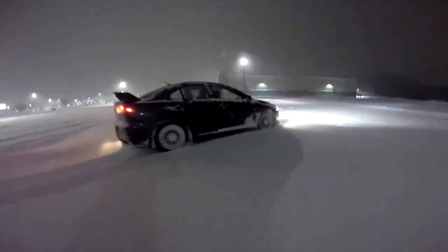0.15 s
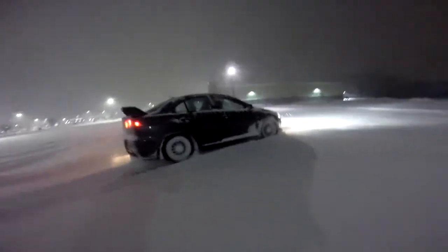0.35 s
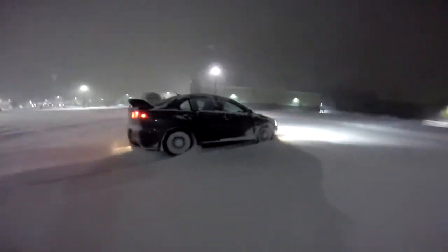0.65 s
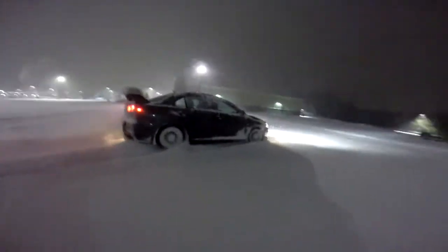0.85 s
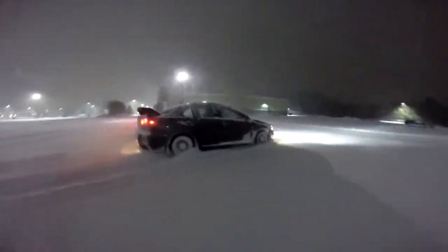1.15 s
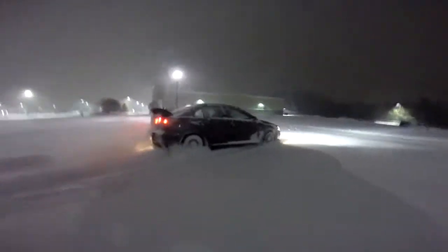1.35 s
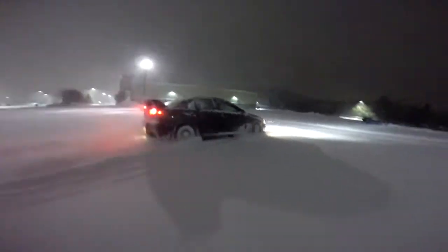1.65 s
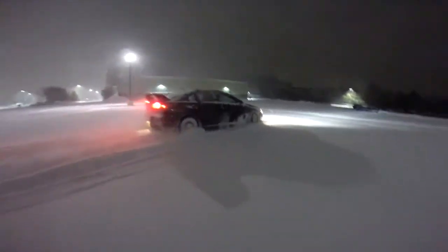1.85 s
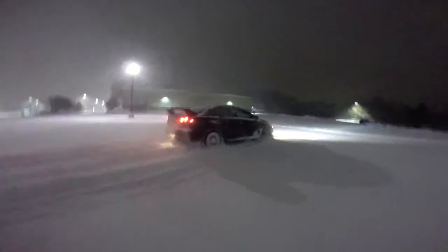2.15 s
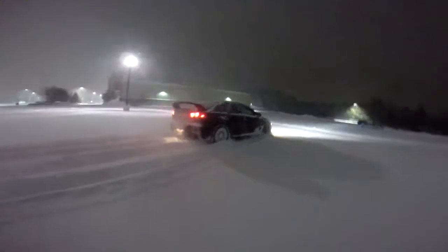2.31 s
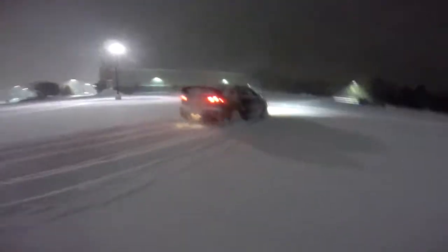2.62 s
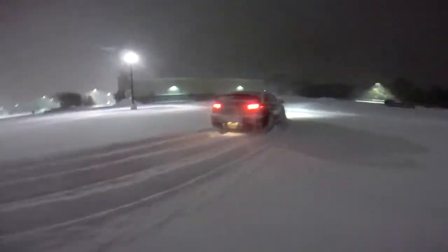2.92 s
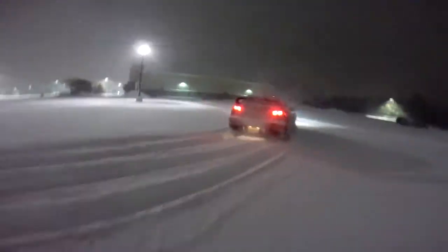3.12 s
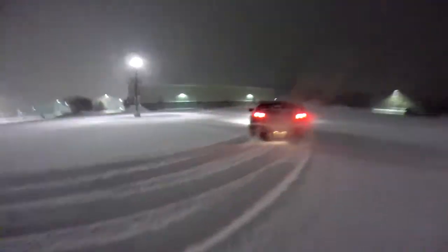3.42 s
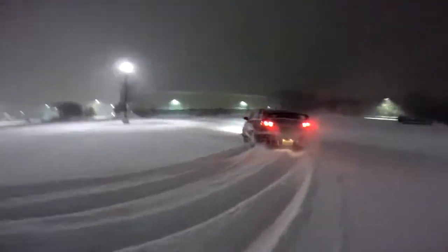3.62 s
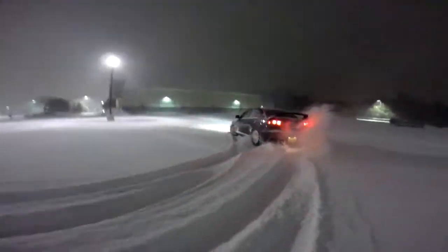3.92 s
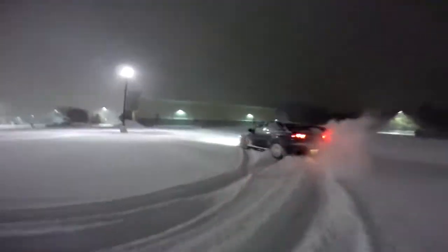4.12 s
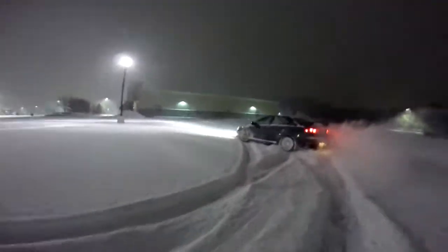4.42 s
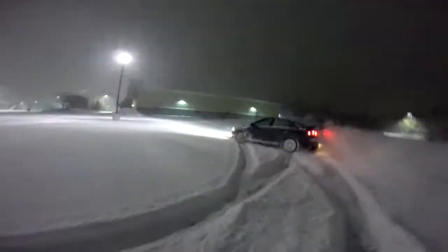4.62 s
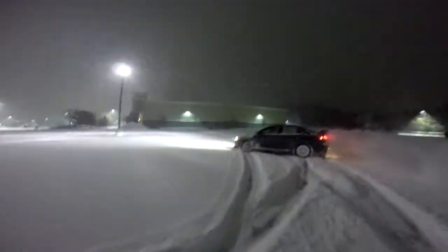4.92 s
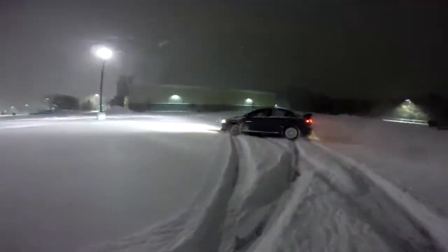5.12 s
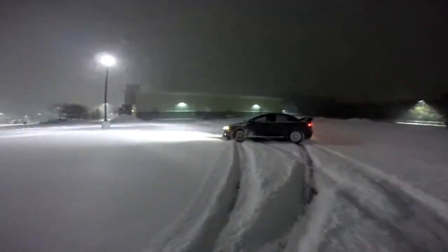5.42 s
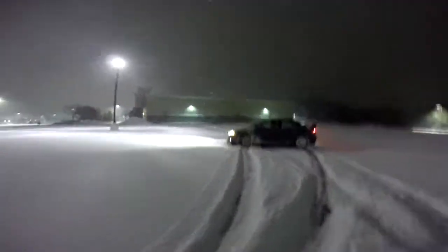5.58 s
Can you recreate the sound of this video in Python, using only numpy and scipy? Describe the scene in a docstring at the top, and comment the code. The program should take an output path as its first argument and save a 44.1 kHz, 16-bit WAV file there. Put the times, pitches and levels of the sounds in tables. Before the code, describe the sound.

Brittle, dry clicks and crumbling grains strike a plastic housing right at the microphone, busiest early on. Behind them a car drifts through deep snow: a soft low engine drone that sags, rises and drops again, with grainy tyre churn, spray swishes and brief scrunches. Low wind gusts buffet the microphone. Finally the engine slows and pressurised air escapes in a breathy hiss. Open air, no echo.

```python
"""Crumbs of icy snow tick and crumble on a plastic housing by the microphone: each is a burst of crushing noise
that rings the housing. A snowy car park at night, a turbocharged four-cylinder car sliding round close by in light wind.
Tyres churn, spray and scrunch the snow (shaped noise and grains); the muffled exhaust hums low (sines at the firing
orders, with chuffs of noise). Wind rumbles on the microphone (low noise). At the end the revs fall and the turbo
vents its boost in a hiss (noise through resonances)."""
import sys
import numpy as np
from scipy import signal
from scipy.fft import rfft, irfft
from scipy.io import wavfile
from scipy.ndimage import uniform_filter1d

SR = 44100
rng = np.random.default_rng(int(sys.argv[2]) if len(sys.argv) > 2 else 0)


def generate_wav(sig):
    """Save sig (samples, or channels by samples) to the path in sys.argv[1] as 16-bit PCM at SR."""
    pcm = np.round(np.clip(np.atleast_2d(sig).T, -1, 1) * 32767).astype(np.int16)
    wavfile.write(sys.argv[1], SR, pcm)


N = 253575
TIME = np.arange(N) / SR   # seconds


def from_db(db):
    """Decibels to an amplitude factor."""
    return 10 ** (np.asarray(db) / 20)


def rms_one(x):
    """Scales a sound to rms 1."""
    return x / np.sqrt(np.mean(x ** 2) + 1e-20)


def in_time(rows):
    """Columns of a curve table, joined by straight lines, at every sample."""
    s, *columns = np.transpose(rows)
    return [np.interp(TIME, s, c) for c in columns]


def drift(rate):
    """Smooth chance with about `rate` turns a second; spread 1."""
    step = 40   # samples between the slow values
    r = np.exp(-2 * np.pi * rate * step / SR)
    settle = 2000
    noise = rng.standard_normal(N // step + settle + 2)
    slow = signal.lfilter([1], [1, -2 * r, r * r], noise)[settle:]
    return np.interp(np.arange(N) / step, np.arange(len(slow)), rms_one(slow))


def swell(s, length):
    """A rounded rise and fall that starts at s."""
    return np.sqrt(np.abs(np.sin(np.pi * np.clip((TIME - s) / length, 0, 1))))


def surges(rows, steady_db):
    """Gain of a steady flow with smooth surges (peak time, length, dB) added in power."""
    power = from_db(steady_db) ** 2
    for s, length, db in rows:
        shape = np.cos(np.pi * np.clip((TIME - s) / length, -.5, .5))
        power = power + (from_db(db) * shape) ** 2
    return np.sqrt(power)


def band(x, low_hz, high_hz, order=2):
    """Causal band-pass."""
    edges = [low_hz, min(high_hz, SR / 2 - 1)]
    return signal.sosfilt(signal.butter(order, edges, "band", fs=SR, output="sos"), x)


def coloured(x, spectrum):
    """Filters a steady sound by the spectrum's gains, falling off below its first row; rms 1."""
    hz, db = np.transpose(spectrum)
    bins = np.maximum(np.arange(N // 2 + 1) * SR / N, 1)
    gain = from_db(np.interp(np.log(bins), np.log(hz), db))
    gain = gain * np.minimum(bins / hz[0], 1) ** 2
    return rms_one(irfft(rfft(x) * gain, N))


def ring(x, hz, t60):
    """A unit click sets a sine of height 1 ringing."""
    r, w = from_db(-60 / (t60 * SR)), 2 * np.pi * hz / SR
    return signal.lfilter([0, np.sin(w)], [1, -2 * r * np.cos(w), r * r], x + 1e-18)


def resonance(x, hz, width_hz):
    """Two-pole peak with gain 1 on top."""
    r = np.exp(-np.pi * width_hz / SR)
    numerator = np.array([1, 0, -1]) * (1 - r * r) / 2
    return signal.lfilter(numerator, [1, -2 * r * np.cos(2 * np.pi * hz / SR), r * r], x)


def grains(per_s, spread_db):
    """Random clicks, many small and a few large; rms 1."""
    sizes = from_db(spread_db * np.minimum(rng.exponential(1, N), 4)) * rng.choice([-1, 1], N)
    return rms_one(sizes * (rng.random(N) < per_s / SR))


def fading(x, decay_s):
    """Each click becomes a burst that dies away exponentially."""
    return signal.lfilter([1], [1, -np.exp(-1 / (decay_s * SR))], x)


def unit(v):
    """Scales a short burst to the energy of 4 ms at rms 1."""
    return v / np.sqrt(np.sum(v ** 2) / (.004 * SR) + 1e-20)


# Large crumbs of snow striking the housing. Each row: moment of the crush in seconds, level of the ring
# in dB over 4 ms, strongest ring in Hz, second ring in Hz, crack in dB re ring, thud in dB re ring.
CRUMBS = [(0.0935, -50, 1510, 2930, -16, -8), (0.1185, -46.5, 2780, 4730, 0.5, -12),
          (0.148, -56, 3030, 5400, 2, -20), (0.2662, -45.5, 2300, 3270, -10, -7),
          (0.3137, -39.5, 2820, 4400, -12.5, -19), (0.324, -49, 3370, 5500, -3, -20),
          (0.368, -49.5, 5550, 2370, -8, -3.5), (0.4496, -44, 1900, 2670, -29, -4.5),
          (0.467, -49.5, 3230, 2140, -1, -26), (0.5088, -44.5, 2265, 3500, -19, -5.5),
          (0.5544, -46.5, 2490, 4260, -7, -2), (0.5758, -46, 1590, 2070, -31, -9),
          (0.6188, -48, 1550, 2140, -1, -23), (0.6501, -50, 2130, 2730, -4, -19),
          (0.6829, -47.5, 2310, 5660, -2, -24), (0.7016, -49, 1520, 4600, -4, -2),
          (0.7094, -42.5, 3460, 5600, 1, -26), (0.7247, -35.5, 2510, 4130, -8.5, -10),
          (0.7388, -38, 2480, 2930, -15, -9), (0.8219, -45, 1590, 1920, -6, -1),
          (0.8276, -39, 2700, 5530, -10, -26), (0.8498, -36, 1560, 2340, -28, -9),
          (0.881, -38.5, 2130, 1640, -26, -15), (0.908, -35, 2500, 4220, -16.5, -20),
          (0.9123, -47, 2775, 2398, -13, -2), (0.9454, -27.5, 2730, 3270, -20, -24),
          (1.029, -53, 1780, 4500, -3, -18), (1.0683, -42.5, 5600, 2776, -5, -24),
          (1.1406, -40, 4530, 3635, -7, -16), (1.1568, -41, 2380, 1590, -22, -15),
          (1.1643, -51, 5860, 4690, -3, -23), (1.181, -51.0, 2698, 6120, 4, -16),
          (1.192, -48.5, 2650, 2110, -2, -22), (1.1982, -30.5, 4320, 2310, -9.5, -19),
          (1.2699, -50, 5470, 2690, -3, -16), (1.2837, -39.5, 2460, 1720, -11, -20),
          (1.3004, -36.5, 2720, 2100, -9, -24), (1.306, -33.5, 2260, 1600, -17, -6),
          (1.3083, -31.5, 2120, 1810, -12, -22), (1.314, -42, 1890, 5990, -6, -11),
          (1.3382, -47.5, 1680, 3400, -1, -2), (1.3607, -34, 2350, 3525, -16, -22),
          (1.3865, -38, 1590, 2350, 1, -17), (1.3925, -30, 3500, 4440, -20, -28),
          (1.4012, -40, 5400, 3500, -7, -19), (1.424, -36, 2781, 4600, -6.5, -27),
          (1.4799, -41, 2250, 4630, -3.5, -6), (1.4986, -31.5, 2390, 1740, -8.5, -8.5),
          (1.507, -33, 2254, 2840, -10, -30), (1.5476, -48, 2710, 3450, -6, -14),
          (1.5691, -47.0, 2340, 3470, -12, -16), (1.5978, -43.5, 2650, 1570, -11, -7),
          (1.6459, -47.5, 2668, 1560, -19, -27), (1.6574, -40.5, 4660, 5810, -16, -22),
          (1.7011, -35.5, 2510, 5200, -8, -28), (1.7047, -45, 2540, 4030, -9, -13),
          (1.7315, -51, 2384, 1720, -7, -21), (1.758, -43, 5700, 1620, -5, -28),
          (1.808, -29.5, 2390, 4700, -6, -32), (1.825, -37, 4600, 2280, -11, -21),
          (1.8344, -42.5, 2670, 4290, -7, -29), (1.8561, -40.5, 4700, 3380, -6, -24),
          (1.8652, -40.5, 3540, 5710, -9, -23), (1.8854, -49, 2400, 1680, -1, -25),
          (1.928, -52.5, 2760, 3380, 0, -22), (2.123, -37, 1540, 3200, 0, -16),
          (2.1434, -34.5, 4670, 3470, -3, -27), (2.1554, -29, 2620, 1560, -8, -18),
          (2.1839, -35.5, 1609, 2176, -18, -24), (2.2235, -33, 3360, 4480, -6, -26),
          (2.229, -41.5, 2700, 5790, 2, -12), (2.2484, -46, 2240, 1510, -33, -26),
          (2.2563, -34.5, 5250, 4460, -9, -13), (2.2665, -31.5, 2250, 1700, -8, -29),
          (2.2702, -33.5, 2450, 4260, -14, -33), (2.414, -50.5, 3450, 4720, -11, -25),
          (2.4212, -43.5, 3330, 2670, -14, -13), (2.5666, -48.0, 2750, 1560, -11, -26),
          (2.6095, -43.5, 2640, 1610, -14, -26), (2.8492, -51, 4770, 3420, 0.5, -6),
          (2.881, -49, 3530, 5370, -10, -25), (2.8902, -49.0, 2453, 1790, -26, -24),
          (3.1088, -50, 2790, 2300, -4, -25), (3.1448, -53, 6180, 4330, 2, -11),
          (3.1729, -40, 2600, 3400, -17, -27), (3.244, -46.0, 3550, 5770, 0, -23),
          (3.2641, -46.5, 2730, 5300, -15, -22), (3.4727, -44.5, 1672, 2160, -12, -9),
          (3.848, -48.0, 2450, 1810, -33, -21), (3.9936, -38, 3560, 4330, -12, -29),
          (4.1823, -47.5, 1460, 3530, -33, -24), (4.3324, -39.0, 3600, 4300, -8.5, -23),
          (4.4424, -47.5, 2800, 2090, -22, -20), (4.6699, -38.5, 1540, 2230, -17, -3.5),
          (4.7443, -46.5, 4700, 3480, -7, -18), (5.2145, -46, 4600, 2260, -6.5, -22),
          (5.2794, -39.5, 5600, 2830, -13, -27), (5.3433, -40, 2670, 2000, -14, -12),
          (5.5408, -37, 2420, 3530, -13.5, -9)]
# Modes of the plastic housing. Each row: pitch in Hz, relative level in dB, t60 in seconds.
HOUSING = [(1590, 2, 0.012), (1842, 8.5, 0.0038), (2395, 7, 0.0084), (2730, 2, 0.016), (3433, 5, 0.0056),
           (4150, 0, 0.0084), (4670, 6, 0.0051), (5440, 2, 0.0099), (7270, -4.5, 0.016)]


def crumbs(second_db=-7.5, housing_db=-2.0, dry_db=-10.5, width_share=0.066,
           crush_s=0.00035, debris_db=-11.5, debris_s=0.0032, focus_db=13.0, low_edge_share=0.66):
    """Each crumb is crushed in about a millisecond: a crack, two rings set by where it lands, other modes, a thud."""
    out = np.zeros(N + SR)
    t = np.arange(SR // 30) / SR
    lead_s = .002   # loose flakes touch down just ahead of the crumb and just after it
    since = np.maximum(t - lead_s + crush_s, 0) / crush_s
    flakes = np.exp(-np.abs(t - lead_s) / debris_s) * np.minimum(t / lead_s, 1)
    pressure = since * np.exp(1 - since) + from_db(debris_db) * flakes
    for s, db, hz, second_hz, crack_db, thud_db in CRUMBS:
        jerks = rng.standard_normal(len(t))
        force = jerks * np.abs(jerks) * pressure   # ice gives way in jerks
        low_edge_hz = low_edge_share * min(hz, second_hz)
        drive = band(force, max(low_edge_hz, 1300), 7200, order=4)
        others = np.zeros(len(t))
        for mode_hz, mode_db, t60 in HOUSING:
            if mode_hz > low_edge_hz:
                # modes far from the strongest ring are driven less, by focus_db an octave
                driven_db = mode_db - focus_db * abs(np.log2(mode_hz / hz))
                others += rng.choice([-1, 1]) * from_db(driven_db) * unit(ring(drive, mode_hz, t60))
        first = unit(resonance(drive, hz, width_share * hz))
        second = unit(resonance(drive, second_hz, width_share * second_hz))
        crunch = unit(band(drive, 1200, 1.9 * max(hz, second_hz)))   # the crush itself, heard directly
        body = first + from_db(second_db) * second
        body = unit(body + from_db(housing_db) * unit(others) + from_db(dry_db) * crunch)
        crack = unit(band(band(force, 5230, 14700, order=3), 3270, 7600, order=1))
        thud = unit(unit(band(force, 100, 805, order=3)) + 0.42 * unit(resonance(force, 702, 125)))
        start = int((s - lead_s) * SR)
        strike = body + from_db(crack_db) * crack + from_db(thud_db) * thud
        out[start:start + len(t)] += from_db(db) * strike
    return out[:N]


# Clumps of snow crumbling over the housing. Each row: start in seconds, length in seconds,
# level in dB before clump_db is added.
CLUMPS = [(0.105, 0.037, -50.5), (1.298, 0.033, -48), (1.348, 0.069, -45.5), (1.467, 0.049, -55),
          (1.532, 0.049, -55.5), (1.755, 0.038, -46), (1.806, 0.048, -43.5), (1.851, 0.077, -45.5),
          (1.925, 0.077, -54.5), (2.109, 0.052, -38), (2.208, 0.087, -40.5), (2.406, 0.068, -49.5),
          (2.799, 0.09, -56.5), (2.8, 0.52, -64), (3.095, 0.074, -57), (3.22, 0.051, -53.5),
          (4.448, 0.014, -45)]
# Spectrum filter of the crumbling. Each row: frequency in Hz, relative gain in dB.
CLUMP_COLOUR = [(400, -12), (750, -7), (1100, -2.5), (1550, 0), (1900, 0), (2500, 5), (3100, 1.5),
                (3500, 1), (4700, -2.5), (5100, -6), (5700, 0.5), (8000, -9), (13000, -12.5), (16000, -23)]


def clumps(clump_db=-1.5, fine_share=0.37, thump_db=-14.5, grain_s=0.00068, pitched_share=0.33):
    """Clumps thump softly and break into separate grains, dealt out among ten pitches."""
    crushes = fading(np.abs(grains(650, 3.0)) + 1e-18, grain_s)
    rasp = rms_one(crushes * rng.standard_normal(N))
    pitches = np.geomspace(1300, 9000, num=10)
    dealt = rng.integers(0, len(pitches), N)[np.arange(N) // (SR // 400)]   # a new pitch 400 times a second
    pitched = np.zeros(N)
    for k, hz in enumerate(pitches):
        pitched += resonance(rasp * (dealt == k), hz, 0.22 * hz) / np.sqrt(hz)
    rasp = rasp + pitched_share * rms_one(pitched) + fine_share * rng.standard_normal(N)
    thump = from_db(thump_db) * rms_one(band(rasp, 117, 440))
    level = sum(from_db(db) * swell(s, length) for s, length, db in CLUMPS)
    return from_db(clump_db) * level * (coloured(rasp, CLUMP_COLOUR) + thump)


# Snow dust drifting on to the housing. Each row: time in seconds, level in dB before dust_db is added.
DUST = [(0, -68.5), (.6, -56.5), (1.2, -59), (1.9, -54.5), (2.65, -65), (3.1, -64), (3.5, -65.5),
        (4.2, -64.5), (5.0, -61), (5.75, -60.5)]


def dust(dust_db=0.5, click_share=0.32):
    """Flurries of specks, each a crush of a fraction of a millisecond, tick on the housing and ring its modes."""
    level_db, = in_time(DUST)
    flurries = grains(140, 3.3) * from_db(3 * drift(15))
    specks = fading(flurries, .0003) * rng.standard_normal(N)
    rings = sum(from_db(db) * ring(specks, hz, t60) for hz, db, t60 in HOUSING)
    clicks = rms_one(band(specks, 3840, 10500))
    patter = rms_one(band(rings, 1100, 7600)) + click_share * clicks
    return from_db(level_db + dust_db) * patter


# How hard the wheels churn the snow. Each row: time in seconds, level in dB before churn_db is added.
CHURN = [(0.0, -60.5), (0.62, -60), (1.17, -59), (1.39, -54), (1.81, -60.5), (2.07, -55.5), (2.5, -60.5),
         (2.85, -60.5), (3.39, -58), (4.0, -57), (4.39, -59), (4.87, -59), (5.49, -60.5), (5.75, -59.5)]
# The wheels bite and throw a fan of snow. Each row: peak in seconds, length in seconds, level in dB.
SPRAYS = [(.29, 0.22, -59), (1.0, 0.099, -60.5), (1.43, 0.38, -54.5), (2.09, 0.7, -58.5),
          (3.38, 0.056, -55.5), (3.72, 0.11, -57.5), (3.86, 0.39, -61.5), (3.99, 0.3, -60.5),
          (4.16, 0.28, -59), (4.81, 0.061, -54), (4.91, 0.26, -56)]
# Spectrum filters of the churning, the spray and the hiss. Each row: frequency in Hz, relative gain in dB.
CHURN_COLOUR = [(50, 17.5), (110, 10.5), (180, 1), (300, 2.5), (500, 0), (780, -2.5), (1100, -6),
                (1350, -6), (1560, -2), (1850, -6.5), (3000, -18.5), (6000, -59)]
SWISH_COLOUR = [(900, -25), (1550, 12), (1900, 0), (2300, 11), (2850, 12), (3300, 1), (4300, -8),
                (5000, -19), (5600, -2), (6500, -30), (10000, -36), (15000, -70)]
HISS_COLOUR = [(2000, 3), (4000, 3.5), (5600, -0.5), (7500, -5), (9000, -8.5), (10400, -8), (12000, -12.5),
               (15000, -21), (17000, -54)]
SPRAY_DB = -69   # swish of the snow that the wheels throw all the time


def wheels(churn_db=5.0, hiss_db=-66.5):
    """Tyres churn the snow and throw a spray that swishes in quick swells, over a faint steady hiss."""
    level_db, = in_time(CHURN)
    churn = coloured(rng.standard_normal(N) + .5 * grains(900, 4.2), CHURN_COLOUR)
    churn = from_db(level_db + churn_db + 2.0 * drift(35.5)) * churn
    spray = coloured(rng.standard_normal(N) + 0.6 * grains(2800, 5.1), SWISH_COLOUR)
    spray = surges(SPRAYS, SPRAY_DB) * from_db(1.0 * drift(40)) * spray
    return churn + spray + from_db(hiss_db) * coloured(rng.standard_normal(N), HISS_COLOUR)


# Packed snow scrunching and squeaking under the tyres. Each row: start in seconds, length in seconds,
# pitch in Hz, width of the first of two resonances as a share of the pitch, level in dB.
SCRUNCHES = [(0.236, 0.069, 3580, 0.088, -57.5), (3.67, 0.058, 3550, .12, -63),
             (4.114, 0.099, 1420, 0.37, -54), (4.35, 0.045, 2560, 0.14, -58),
             (4.743, 0.29, 450, 0.16, -61.5)]


def scrunches():
    """Snow slips in many tiny jerks, ringing round one pitch."""
    slips = grains(1200, 4.6)
    out = np.zeros(N)
    for s, length, hz, width_share, db in SCRUNCHES:
        width_hz = width_share * hz
        squeak = rms_one(resonance(resonance(slips, hz, width_hz), hz, 2 * width_hz))
        out += from_db(db) * swell(s, length) * squeak
    return out


# Engine speed. Each row: time in seconds, firing rate in Hz.
REVS = [(0, 84), (.75, 90.6), (1.45, 89), (1.7, 85), (2.0, 78.5), (2.45, 66), (2.7, 78), (2.9, 94),
        (3.2, 99), (3.45, 111), (3.7, 116.5), (4.4, 86), (4.7, 77), (5.05, 96), (5.4, 67), (5.58, 58),
        (5.75, 58)]
# The driver eases off the throttle. Each row: start in seconds, length in seconds, drop of the firing tone in dB.
LIFTS = [(1.1, 0.66, 15), (2.42, 0.12, 10), (2.76, 0.42, 5), (3.84, 0.52, 16), (4.361, 1, 8)]
TONE_DB, OCTAVE_DB = -55.5, -69.5   # firing tone and its octave under throttle, at cruising revs
CRUISE_HZ, BOOM_HZ, BOOM_DB = 93.3, 58, 16   # the exhaust booms as the revs sink from cruising to this rate
OCTAVE_DB_PER_OCTAVE = 13   # the note hardens as the revs climb above cruising
TAIL_ON_S, TAIL_ON_LENGTH_S, TAIL_ON_DB = 1.75, 2.75, 4   # tailpipe swings to the microphone: overtones gain


def engine(upper_db=-11.0, half_db=-14.5, octave_boom=0.32, octave_lift=0.15, chuff_db=-8.5):
    """Exhaust through a silencer: firing tone, fading overtones, half orders of uneven firing, and chuffs."""
    hz, = in_time(REVS)
    boom_db = BOOM_DB * np.clip((CRUISE_HZ - hz) / (CRUISE_HZ - BOOM_HZ), 0, 1)
    lift_db = sum(db * swell(s, length) for s, length, db in LIFTS)
    first_db = TONE_DB + boom_db - lift_db
    second_db = OCTAVE_DB + OCTAVE_DB_PER_OCTAVE * np.maximum(np.log2(hz / CRUISE_HZ), 0)
    second_db = second_db + octave_boom * boom_db - octave_lift * lift_db
    second_db = second_db + TAIL_ON_DB * swell(TAIL_ON_S, TAIL_ON_LENGTH_S)
    # bogged down in the snow, the cylinders fire less evenly
    lugging_db = np.interp(TIME, [1.8, 2.15, 2.45], [-6, 9, -7])
    orders = [(1, first_db), (2, second_db)]   # multiple of the firing rate, level in dB
    for i, k in enumerate([3, 4, 5, 6]):
        orders.append((k, second_db + upper_db - 2.0 * i))
    for i, k in enumerate([1.5, 2.5]):
        orders.append((k, first_db + half_db + lugging_db - 8.3 * i))
    phase = 2 * np.pi * np.cumsum(hz * (1 + .003 * drift(10))) / SR
    tones = np.zeros(N)
    for k, db in orders:
        unsteady = 1 + min(.2 * k, .6) * drift(16)
        wander = .14 * k * drift(12) + rng.uniform(0, 2 * np.pi)
        tones += from_db(db) * unsteady * np.sin(k * phase + wander)
    puffs = rng.standard_normal(N) * (1 + np.cos(phase)) ** 3   # one puff of noise a firing
    return tones + from_db(second_db + chuff_db) * rms_one(band(puffs, 113, 305))


# Resonances of the vent. Each row: pitch in Hz, width in Hz of each of two passes, gain in dB before the deepening.
VENT_MODES = [(1230, 490, -11), (1613, 180, 0), (2004, 170, 1.5), (2584, 490, 3), (2960, 310, 7),
              (3600, 360, 2), (4330, 840, 4.5), (4650, 510, 1.5), (5620, 420, 0.5), (6430, 1000, -9),
              (7540, 390, -11), (8900, 650, -19), (9900, 1100, -22.5), (12000, 3800, -28)]
VENT_S, VENT_RISE_S, VENT_RISE_DB = 5.069, 0.29, 18   # the valve starts to open; time and swing of its rise
VENT_DEEPEN_DB_PER_S = 23.5   # gain of a resonance an octave below 3 kHz, once fully open
VENT_HOLD_DB, VENT_PUFF_DB, VENT_PUFF_S = -48, 5.5, 0.12   # hiss before deepening; first puff, its drain time


def turbo_vent(flutter_db=1.8):
    """Boost air rushes through the valve and pipe resonances: a puff, then a hiss deepening as pressure falls."""
    since_open = TIME - VENT_S - VENT_RISE_S
    opening = np.minimum(since_open / VENT_RISE_S, 0)
    draining_s = np.maximum(since_open, 0)
    level_db = VENT_HOLD_DB + VENT_RISE_DB * opening + VENT_PUFF_DB * np.exp(-draining_s / VENT_PUFF_S)
    deep_db = VENT_DEEPEN_DB_PER_S * draining_s
    hiss, power = 0, 0
    for hz, width, db in VENT_MODES:
        mode = from_db(db) * resonance(resonance(rng.standard_normal(N), hz, width), hz, width)
        power += np.mean(mode ** 2)
        octaves_below = np.clip(np.log2(3000 / hz), 0, 2)
        hiss += mode * from_db(deep_db * octaves_below + flutter_db * drift(18))
    return from_db(level_db) * hiss / np.sqrt(power) * (TIME > VENT_S)


# Sharp buffets of wind knocking on the microphone. Each row: start in seconds, length in seconds, level in dB.
BUFFETS = [(1.932, 0.045, -54.5), (2.794, 0.045, -50)]


def buffets():
    """Short, dull knocks of air: swells of low noise."""
    level = sum(from_db(db) * swell(s, length) for s, length, db in BUFFETS)
    return level * rms_one(band(rng.standard_normal(N), 105, 210))


# Gusts at the microphone. Each row: peak in seconds, length in seconds, level in dB.
GUSTS = [(1.18, 1, -31), (2.05, 0.38, -27), (2.79, 0.36, -26), (3.01, 0.091, -28.5), (3.52, 0.39, -29),
         (4.05, 0.77, -27.5), (4.5, 0.5, -32), (4.92, 0.32, -26), (5.65, 0.3, -29.5)]
# Spectrum filter of the wind. Each row: frequency in Hz, relative gain in dB.
WIND_COLOUR = [(10, 2.5), (15, -2), (24, -0.5), (35, -12.5), (50, -17.5), (80, -31.5), (130, -35.5),
               (250, -42.5), (600, -102)]
BREEZE_DB = -36.5   # wind on the microphone between gusts


def wind(evenness=0.64, flutter_follows=0.45, flutter_hz=70):
    """Slow eddies at the microphone swell with each gust; the quicker flutter above them stays steadier."""
    eddies = coloured(rng.standard_normal(N), WIND_COLOUR)
    slow = signal.sosfiltfilt(signal.butter(2, flutter_hz, fs=SR, output="sos"), eddies)
    flutter = eddies - slow
    # partly level the chance swells of the slow eddies
    strength = np.sqrt(uniform_filter1d(slow ** 2, size=SR // 6, mode="wrap") + 1e-9)
    gusts = surges(GUSTS, BREEZE_DB)
    steadier = gusts.mean() * (gusts / gusts.mean()) ** flutter_follows
    return gusts * rms_one(slow / strength ** evenness) + steadier * flutter


def scene():
    """Open air over soft snow: the sources add up with no echoes."""
    on_housing = crumbs() + clumps() + dust()
    car = wheels() + scrunches() + engine() + turbo_vent()
    air = buffets() + wind()
    return (on_housing + car + air)[None]


def record(dry):
    """The microphone channel cuts the top steeply above 16 kHz."""
    return signal.sosfilt(signal.ellip(10, .2, 90, 16000, fs=SR, output="sos"), dry)


dry = scene()
out = record(dry)
generate_wav(out)
```